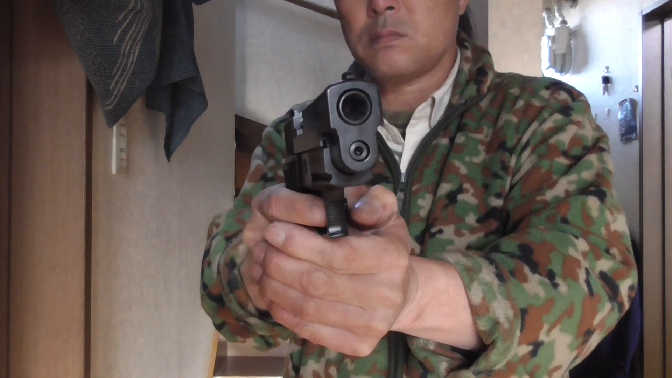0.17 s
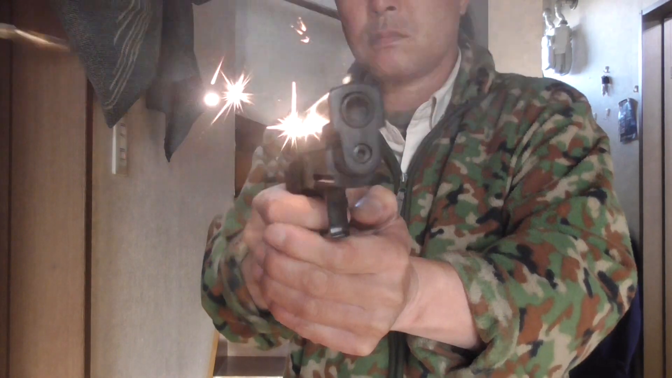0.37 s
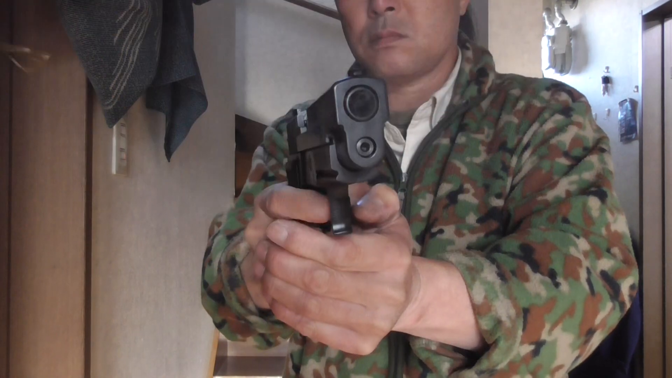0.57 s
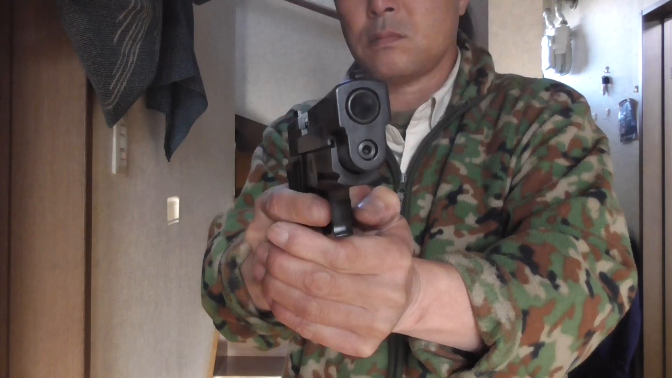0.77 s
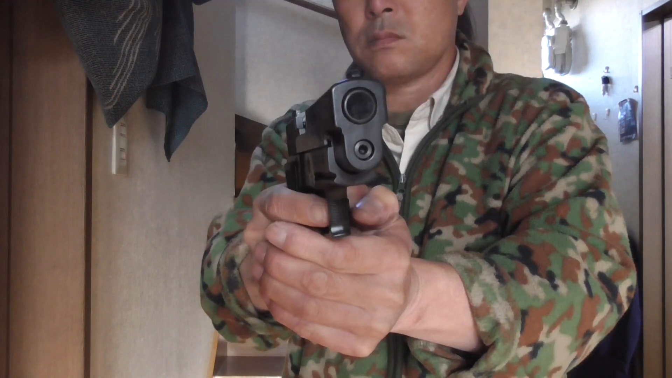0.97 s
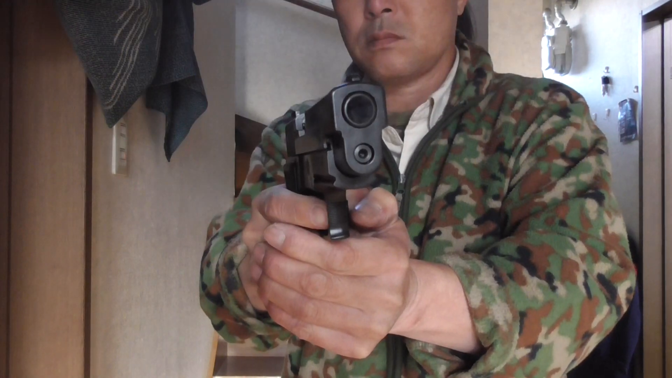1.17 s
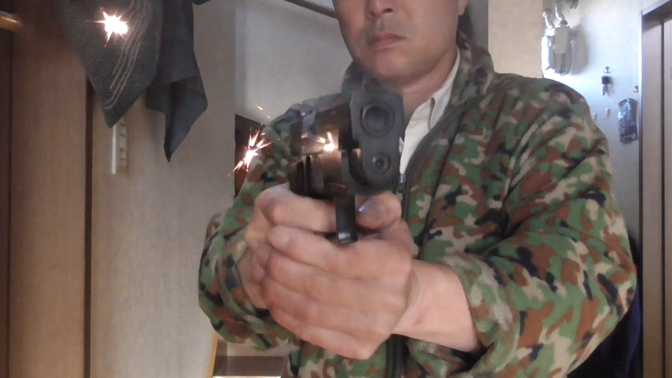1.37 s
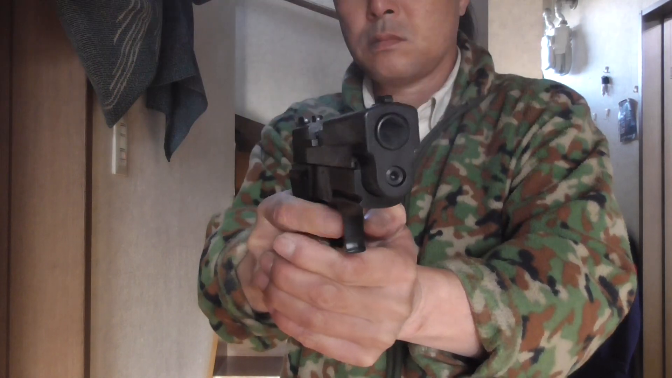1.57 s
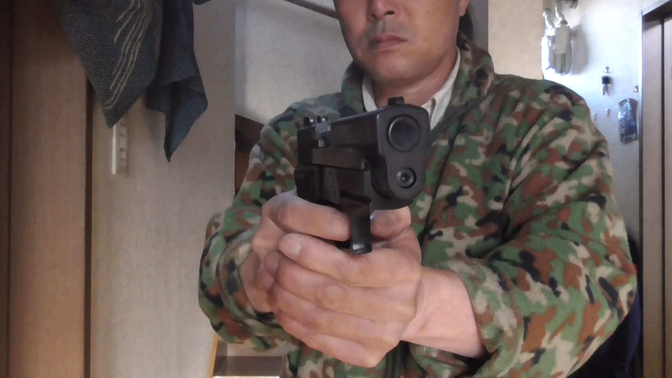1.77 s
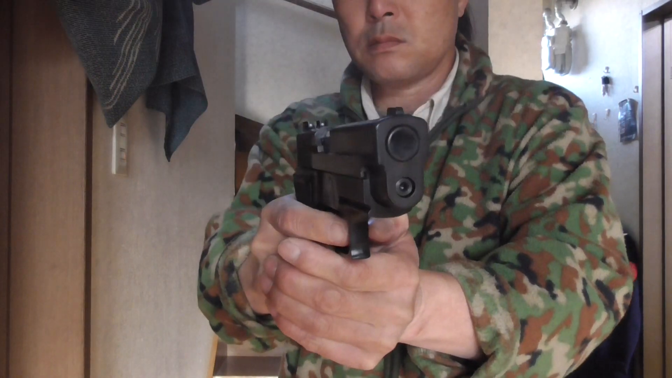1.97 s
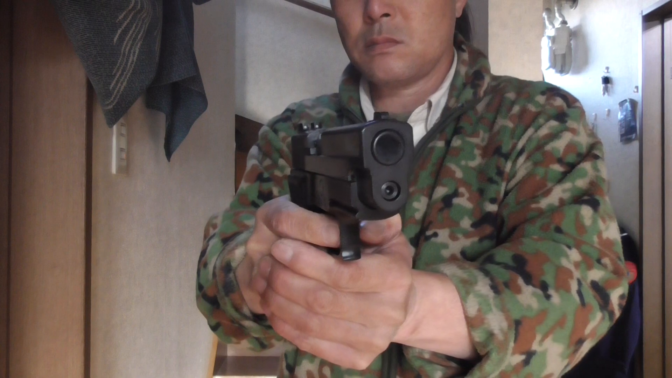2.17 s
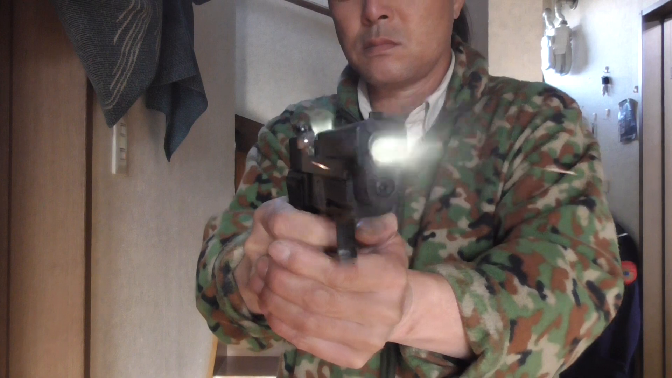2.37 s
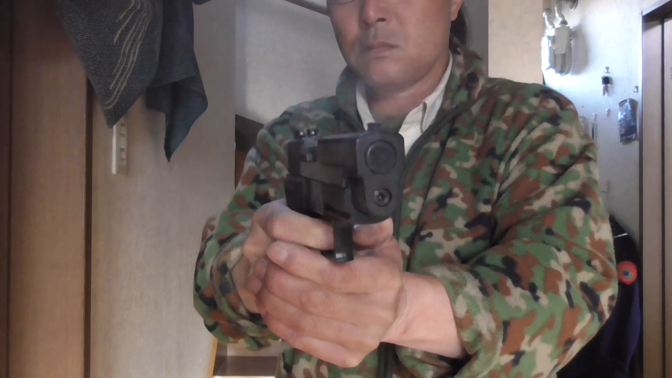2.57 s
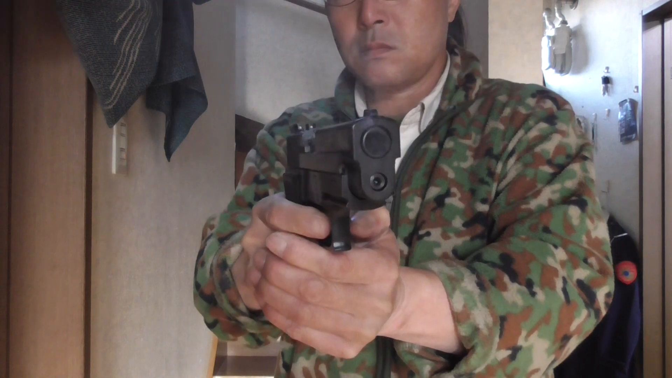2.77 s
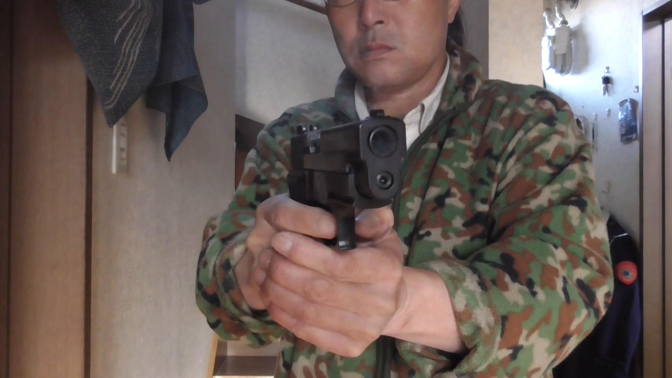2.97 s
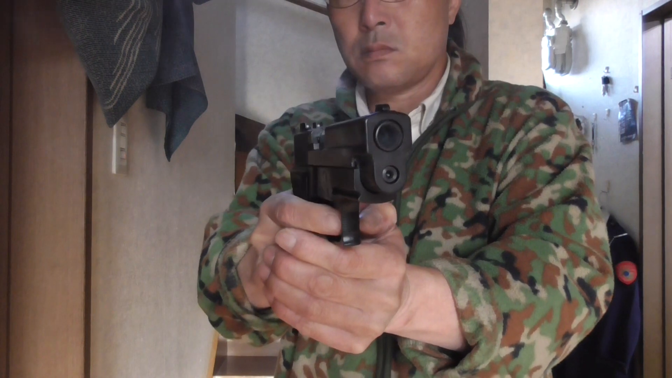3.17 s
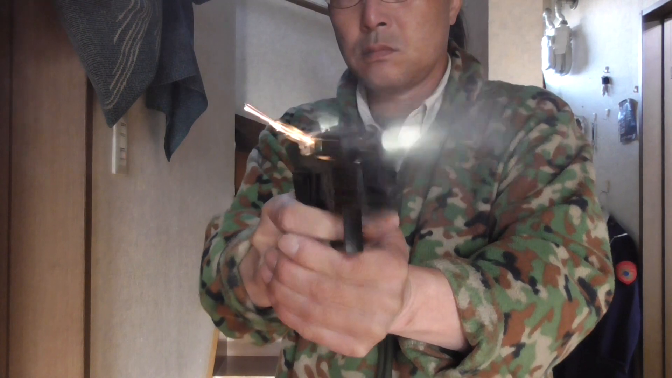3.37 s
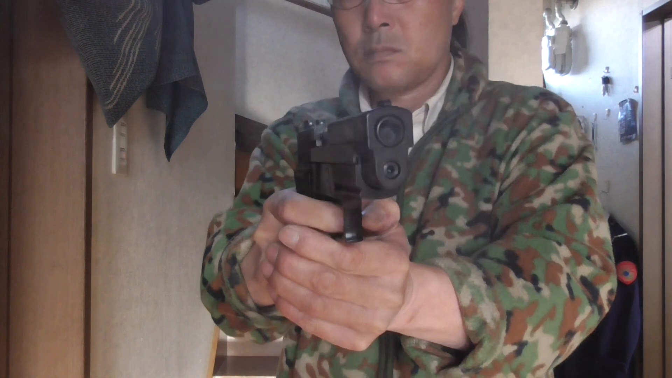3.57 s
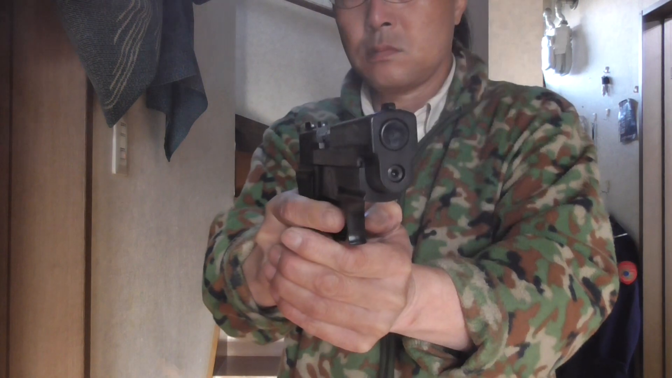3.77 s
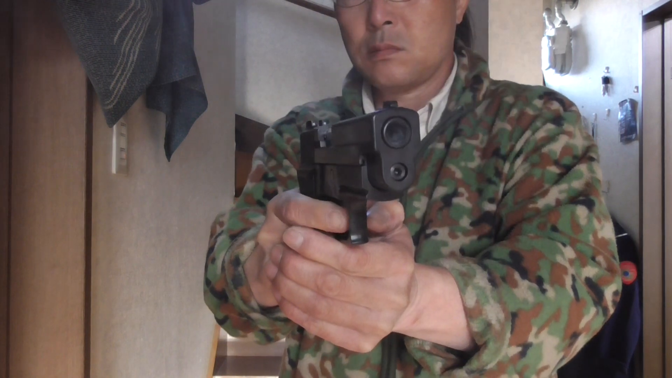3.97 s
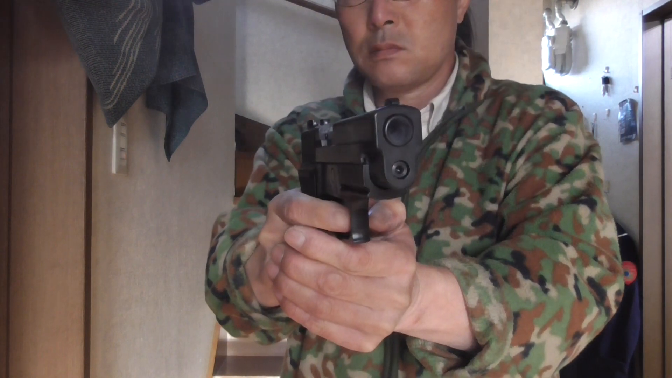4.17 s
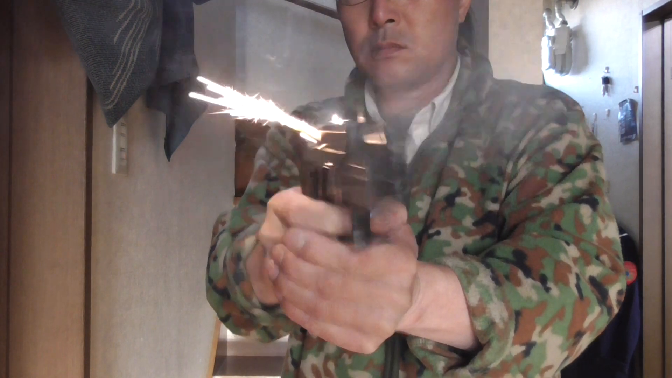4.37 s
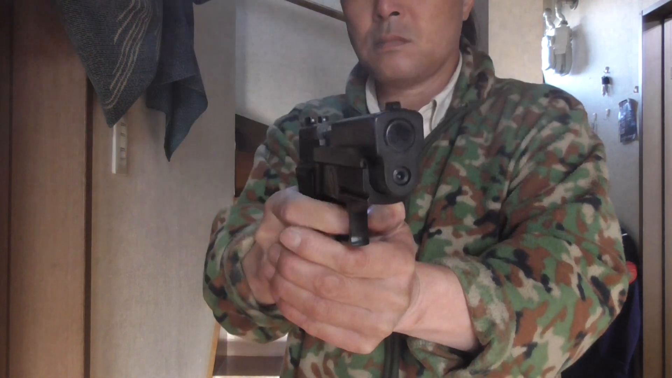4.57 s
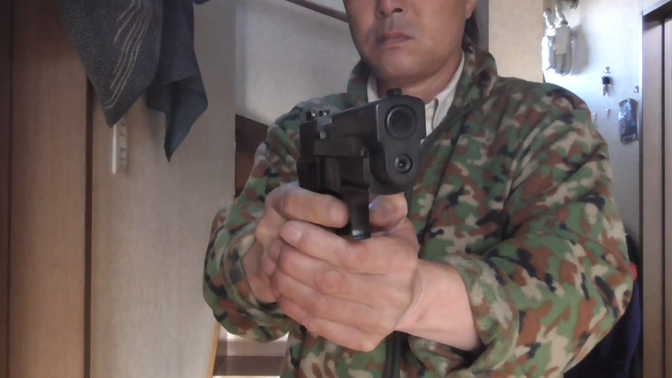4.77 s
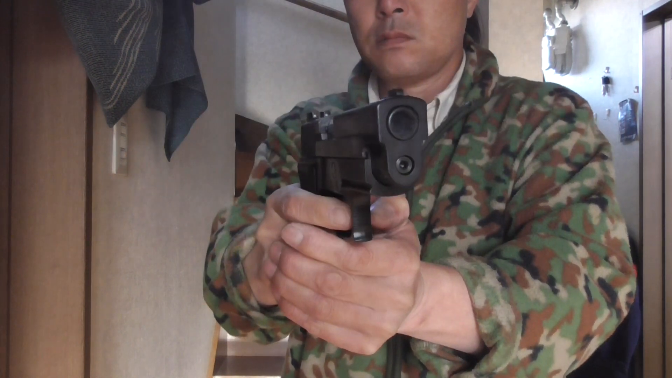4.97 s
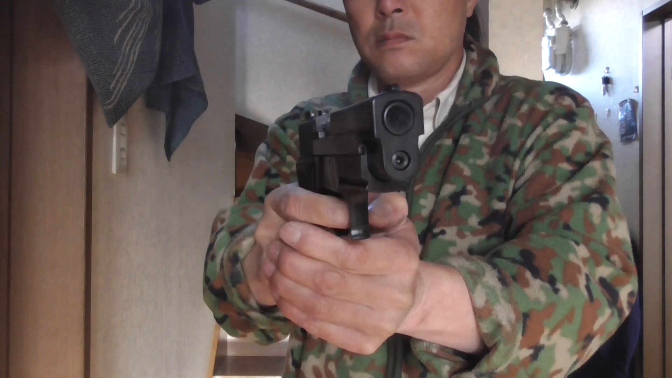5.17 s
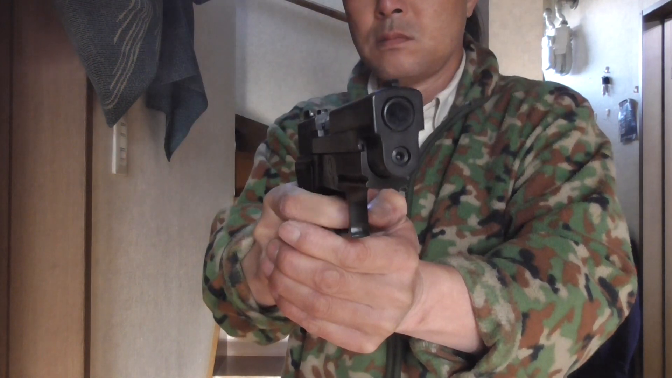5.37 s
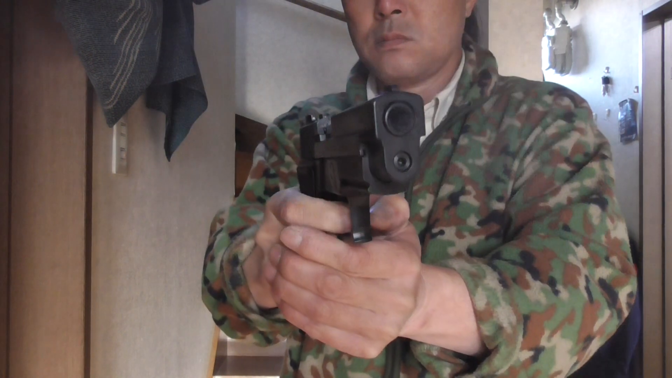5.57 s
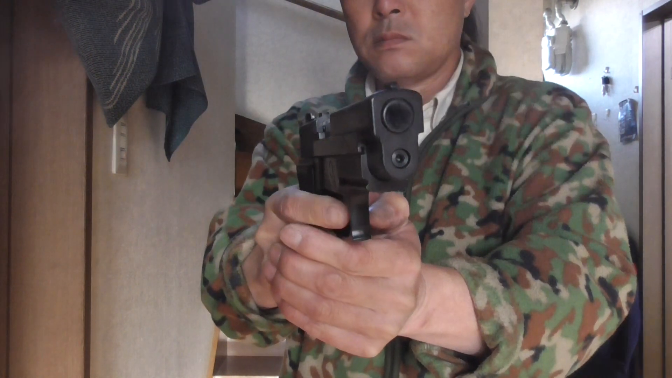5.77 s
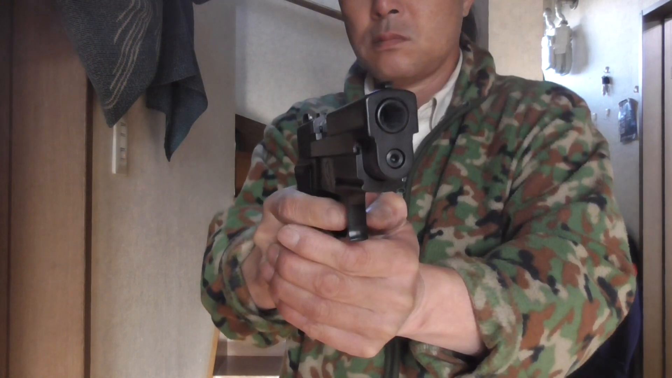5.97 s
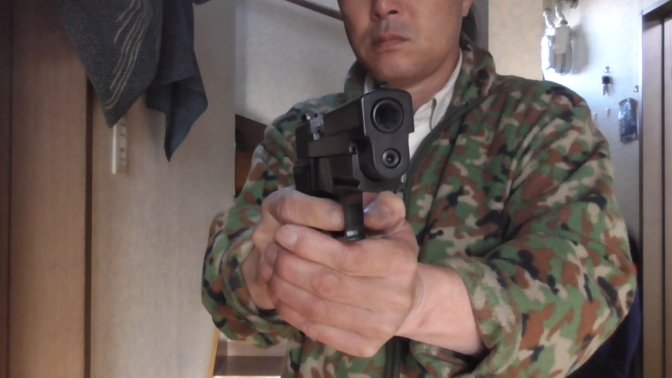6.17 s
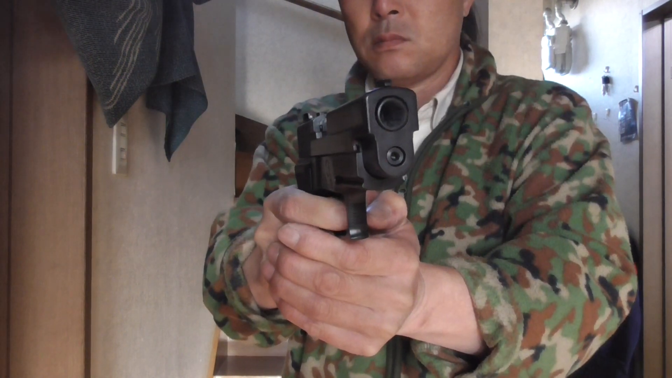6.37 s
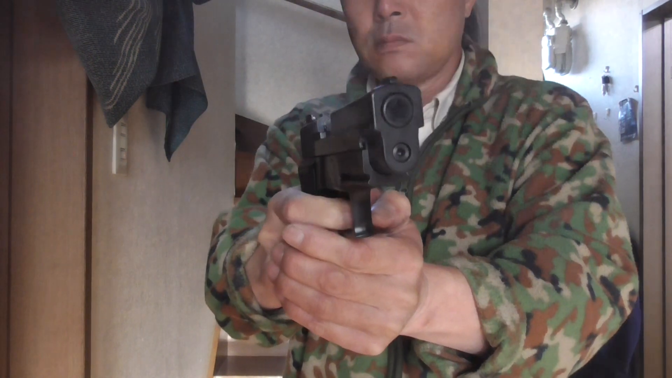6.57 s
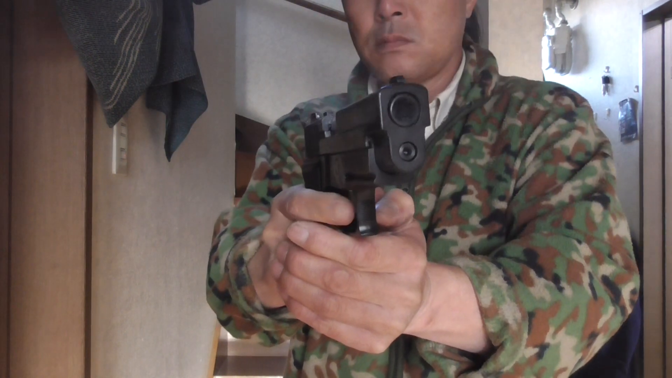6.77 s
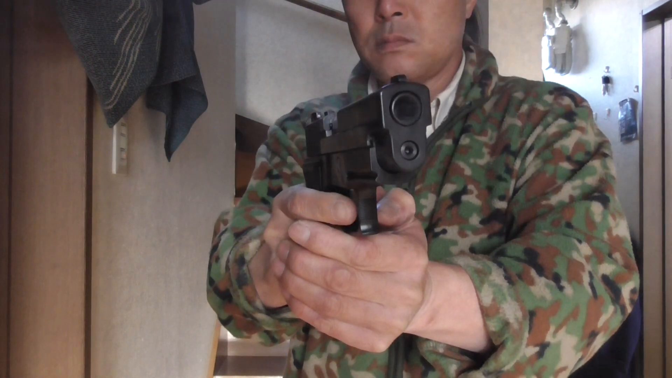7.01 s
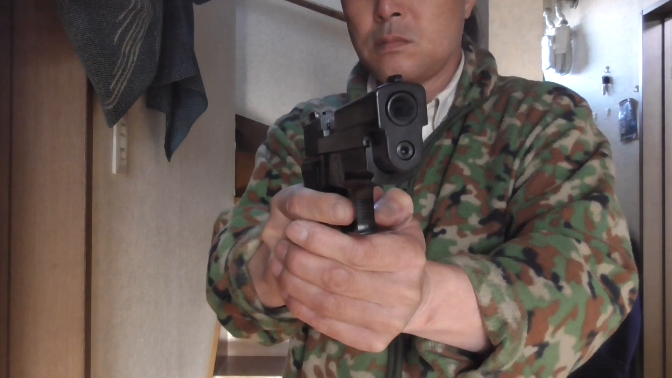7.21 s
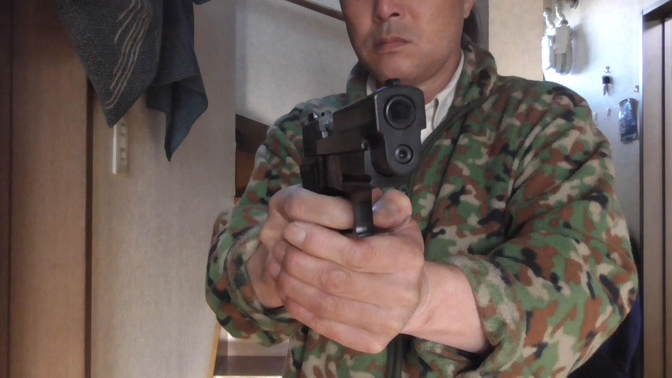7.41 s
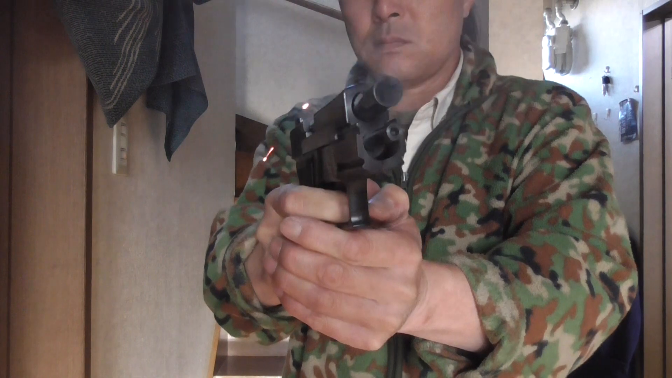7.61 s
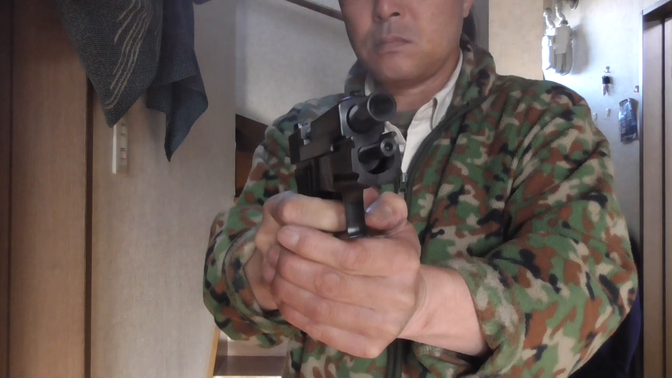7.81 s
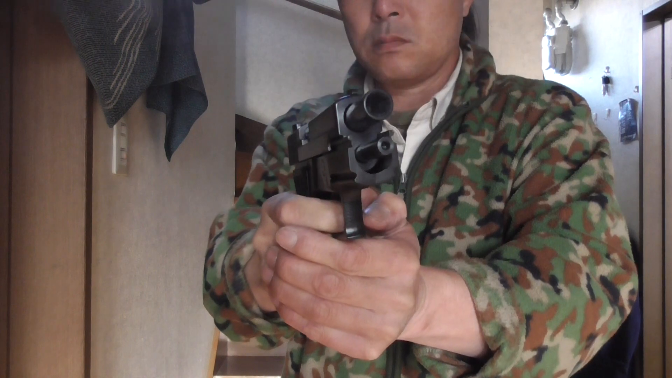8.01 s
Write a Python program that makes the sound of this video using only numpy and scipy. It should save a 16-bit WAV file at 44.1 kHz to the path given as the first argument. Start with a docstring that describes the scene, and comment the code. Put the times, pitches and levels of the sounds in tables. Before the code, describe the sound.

Steady cap-gun fire in a hard, reverberant hallway: a snapping bang every second, loud enough to clip the close microphone, followed by a quick roomy tail. About a tenth of a second later the spent case smacks the wall, and roughly half a second after that it lands on floorboards with a woody clack. Some shots have a thin steel hammer click; light ticks and low hiss lie between.

```python
"""In a hard-walled hallway a toy pistol fires caps once a second, close to a stereo microphone.
Each shot is a short noise crack, a low thump of the overloaded input and a noise blast shaped by
the hall's decay, with a slower tail from the rooms beyond. The spent metal case hits a wall and
bounces on the wooden floor: noise rattles with dying modes. Hammer clicks, light ticks, a faint
hum, a short low rumble and coloured background noise fill in the rest."""
import sys
import numpy as np
from scipy import signal
from scipy.io import wavfile

SR = 44100
rng = np.random.default_rng(int(sys.argv[2]) if len(sys.argv) > 2 else 0)


def to_wav(s):
    """Save 16-bit WAV."""
    ch = np.atleast_2d(s).T  # columns
    pcm = np.round(np.clip(ch, -1, 1) * 32767)  # PCM
    wavfile.write(sys.argv[1], SR, pcm.astype(np.int16))


N = 354784
LEAD = SR  # samples of scene before time zero
MIDDLE_HZ = 4200  # knock colours are counted against this pitch
# Pitches at which the colour of a knock is given. Each entry: frequency in Hz.
COLOUR_HZ = (250, 900, 2200, 8000, 13500)


def gain_of(db):
    """dB to gain."""
    return 10 ** (np.asarray(db) / 20)


def peaked(x):
    """Scales a sound to peak 1."""
    return x / abs(x).max()


def read(points, hz, column=1):
    """Reads a table on a log-frequency axis, as a column."""
    points = np.array(points)
    return np.interp(np.log(hz + 1), np.log(points[:, 0] + 1), points[:, column])[:, None]


def add(mix, s, sound):
    """Adds a stereo sound at time s."""
    part = mix[:, LEAD + round(s * SR):][:, :sound.shape[1]]
    part += sound[:, :part.shape[1]]


def unit_energy(x):
    """Scales a stereo sound to energy 1, averaged over the channels."""
    return x / np.sqrt(np.mean(np.sum(x ** 2, 1)))


def noise(size, colour, shape):
    """Stereo noise of energy 1 whose short-time magnitude is colour(f) times shape(f, t)."""
    # Likeness of left and right. Each row: frequency in Hz, correlation (held within -1 to 1 below).
    likeness = [(60, -1.7), (120, 0.81), (240, 0.89), (480, 0.83), (950, 0.69), (1890, 0.57), (3770, 0.67),
                (7520, 0.23), (15000, -0.15)]
    frames, hz = size // 128 + 5, np.fft.rfftfreq(512, 1 / SR)
    a, b, c, d = rng.standard_normal((frames, len(hz), 4)).T
    same = np.clip(read(likeness, hz), -1, 1)
    left, other = a + 1j * b, c + 1j * d
    right = same * left + np.sqrt(1 - same ** 2) * other
    magnitude = gain_of(read(colour, hz)) * shape(hz, np.arange(frames) * 128 / SR)
    spectrum = np.array([left, right]) * magnitude
    return unit_energy(signal.istft(spectrum, nperseg=512, noverlap=384)[1][:, :size])


def coloured(points, size=1024):
    """Minimum-phase (causal) impulse response with the given (Hz, dB) spectrum."""
    half = read(points, np.fft.rfftfreq(size, 1 / SR))[:, 0] * np.log(10) / 20
    log_gain = np.concatenate([half, half[-2:0:-1]])
    return np.fft.ifft(np.exp(np.conj(signal.hilbert(log_gain)))).real[:size // 2]


def tilted(colour_db, body, bright):
    """A colour tipped by dB per octave below and above the middle."""
    octaves = np.log2(np.array(COLOUR_HZ) / MIDDLE_HZ)
    return colour_db + body * np.maximum(-octaves, 0) + bright * np.maximum(octaves, 0)


def rings(modes, t, spread, near_hz=None):
    """Dying modes, each a little off its usual pitch; those near the favoured pitch sound most."""
    total = 0
    for hz, db, t60 in modes:
        away_db = 18 * abs(np.log2(hz / (near_hz or hz)))  # 18 dB per octave off the favoured pitch
        pitch = hz * rng.normal(1, spread)
        total = total + gain_of(db - away_db - 60 * t / t60) * np.sin(2 * np.pi * pitch * t)
    return total


def background_noise():
    """Steadily coloured background noise, its level moved by slow recording gain."""
    # Spectrum of the background. Each row: frequency in Hz, relative density in dB.
    background_colour = [(40, -13), (100, -8.5), (300, 2.5), (900, -2), (2000, -10.5), (5000, -22),
                         (8000, -26.5), (11000, -26), (16000, -38.5)]
    slow_gain = [(0, 0.5), (1.2, -13), (2, -2.5), (3, -5.5), (4, -2), (5, -3.5), (6.2, -6.5), (7, -9.5),
                 (8.1, -7.6)]
    steady = noise(N, background_colour, lambda hz, t: gain_of(np.interp(t, *np.transpose(slow_gain))))
    return gain_of(-57.5) * np.sqrt(N) * steady  # RMS in dB


def rumble():
    """Short low noise that swells and fades."""
    # When it sounds. The row: start in seconds, end in seconds.
    rumble_span = (5.2, 5.47)
    start, end = rumble_span
    size = round((end - start) * SR)
    band = signal.butter(2, (60, 300), "bandpass", fs=SR, output="sos")
    low = signal.sosfilt(band, rng.standard_normal(size))
    return start, np.tile(gain_of(-46.5) * low / low.std() * np.hanning(size), (2, 1))


def hum():
    """A faint brief tone whose phase wavers 9 times a second."""
    # The tone. The row: start in seconds, end in seconds, pitch in Hz, peak level in dB.
    hum_note = (1.05, 1.21, 478, -60)
    start, end, hz, db = hum_note
    t = np.arange(0, end - start, 1 / SR)
    tone = np.sin(2 * np.pi * hz * t + 1.8 * np.sin(2 * np.pi * 9 * t))
    return start, np.tile(gain_of(db) * tone * signal.windows.tukey(len(t), .6), (2, 1))


def hall(hz, t):
    """Quick decay of the hallway plus the slow return of the rooms beyond."""
    # Decay of the hallway. Each row: frequency in Hz, t60 in seconds.
    hall_decay = [(60, 0.15), (150, 0.49), (400, 0.71), (1000, 0.65), (2500, 0.36), (5000, 0.53),
                  (9000, 0.25), (15000, 0.17)]
    # Return of the rooms beyond. Each row: frequency in Hz, level against the hallway in dB, t60 in seconds.
    rooms_beyond = [(59.8, -49.5, 2.7), (194, -15.5, 1.4), (790, -25, 1.6), (2060, 1, 0.62),
                    (4460, -31, 1.17), (7550, -6.5, 0.6), (11900, -20.5, 0.56), (15500, -33, .7)]
    near = gain_of(-60 * t / read(hall_decay, hz))
    far = gain_of(read(rooms_beyond, hz) - 60 * t / read(rooms_beyond, hz, column=2))
    return np.sqrt(near ** 2 + far ** 2)


def standing(size):
    """The hall's standing waves, energy 1, nearly alike in both capsules."""
    # Standing waves set off by the blast. Each row: frequency in Hz, relative level in dB.
    hall_modes = [(300, 0), (339, -9), (403, -2.5), (474, -2), (529, -4.5), (581, 1), (654, 1.5), (716, -3),
                  (749, 2), (834, -0.5), (889, -7), (945, -4), (1030, -6.5), (1096, -5), (1211, -6),
                  (1255, -10)]
    t = np.arange(size) / SR
    waves = 0
    for hz, db in hall_modes:
        turns = hz * t + rng.random() + rng.normal(0, 0.095, (2, 1))  # phases differ a little by side
        waves = waves + gain_of(db - 60 * t / 0.6) * np.sin(2 * np.pi * turns)  # t60 of 0.6 s
    return unit_energy(waves)


def knock(tail, db, colour_db, case, wood, pan_db, hall_db, damping, length):
    """A short rattle of the case on wood, the rings of both, and the hall's answer."""
    # Rings of the metal case. Each row: frequency in Hz, relative level in dB, t60 in seconds.
    case_modes = [(2320, -5, 0.05), (3300, -5, .045), (4140, -4, .055)]
    # Rings of boards and panels. Each row: frequency in Hz, relative level in dB, t60 in seconds.
    wood_modes = [(304, -3, 0.04), (375, 0, 0.085), (444, -1.5, 0.05), (535, 0, .04), (815, -3, 0.035),
                  (1000, -3, 0.04), (1220, -3, .04)]
    t = np.arange(tail.shape[1]) / SR
    size = 4000  # samples of ringing
    fade = np.exp(-(t[:600] / length) ** 2)
    weight = np.linalg.norm(fade)
    hit = rng.standard_normal((3, 600)) * fade
    deep_bass = (60, colour_db[0] - 27)  # knocks hold little deep bass
    colour = coloured(sorted([deep_bass, (MIDDLE_HZ, 0), *zip(COLOUR_HZ, colour_db)]))
    rattle = signal.fftconvolve(hit[0] + 1.34 * hit[1:], colour[None], axes=1)
    rattle *= weight / np.linalg.norm(rattle, axis=1, keepdims=True)

    case_ring = gain_of(case[0]) * rings(case_modes, t[:size], .012, case[1])
    wood_ring = gain_of(wood[0]) * rings(wood_modes, t[:size], .02, wood[1])
    ring = (case_ring + wood_ring) * (1 - np.exp(-t[:size] / 0.0012))  # builds up during the contact

    # summed over all directions the rattle keeps only broad humps, other ones at every landing
    humps = np.column_stack([np.geomspace(300, 14000, 22), rng.normal(0, 2.5, 22)])
    colour = np.convolve(colour, coloured(humps))[:len(colour)]
    sent = gain_of(-12) * ring  # the hall gets only a share of the rings
    sent[:len(colour)] += colour * weight / np.linalg.norm(colour)
    late = tail * gain_of(hall_db - max(damping, 0) * t) * np.clip(t / 0.0056, 0, 1)
    out = signal.fftconvolve(sent[None], late, axes=1)[:, :len(t)]

    side = gain_of([[pan_db / 2], [-pan_db / 2]])
    out[:, :size] += ring * side
    out[:, :rattle.shape[1]] += rattle * side
    return gain_of(db) * out


def tick(tail, db, mid_db, hall_db):
    """A knock too light to move the wood or ring the case."""
    colour_db = (-30., -14., -5., -mid_db, -mid_db - 14.5)
    silent = (-99, MIDDLE_HZ)
    return knock(tail, db, colour_db, silent, silent, pan_db=0, hall_db=hall_db, damping=30, length=0.0016)


def wall_hit(tail, db, bright, *case):
    """Every case meets the same wall in much the same way."""
    # Colour of the wall knock at the five COLOUR_HZ. Each entry: level against the middle in dB.
    wall_colour = (-27, 5.5, -9.5, -0.5, -14)
    return knock(tail, db, tilted(wall_colour, 0, bright), case, wood=(-1, 424),  # dB, Hz
                 pan_db=3, hall_db=1.7, damping=7.3, length=0.007)  # damping in dB/s, length in s


def drop(tail, db, body, bright, case_db, case_hz, wood_db, wood_hz, damping):
    """A landing on the floor: flat ones have more body, edge-on ones more treble."""
    # Colour of a landing at the five COLOUR_HZ. Each entry: level against the middle in dB.
    drop_colour = (1.2, 2.1, -6.5, -5, -16)
    return knock(tail, db, tilted(drop_colour, body, bright), (case_db, case_hz), (wood_db, wood_hz),
                 pan_db=-0.3, hall_db=0.5, damping=damping, length=0.0036)


def case_knocks(mix):
    """The flung case and the trigger strike; each knock excites one of six hall responses."""
    # What a knock gets back from the hall. Each row: frequency in Hz, relative level in dB.
    hall_answer = [(100, 3.5), (400, 1), (1000, 2), (1700, 0.5), (2200, 7.5), (2800, 2), (4200, -1),
                   (7000, -2.5), (10000, 1), (15000, -0.5)]
    # The flung case strikes the wall. Each row: start in seconds, level in dB, brightness in dB per
    # octave, ring of the case in dB, its strongest pitch in Hz.
    wall_hits = [(0.539, -19, -2.5, -3, 4220), (1.533, -20, -4, 5, 2330), (2.595, -19.5, -6.5, -3, 4140),
                 (3.601, -19, -2.8, 4, 4170), (4.592, -17.5, -0.5, 0, 3700), (5.628, -22, -0.5, 5, 3300),
                 (6.67, -21, -4.2, 5, 3180), (7.687, -19, 2.5, -14, 4120)]
    # The case lands and bounces. Each row: start in seconds, level in dB, body in dB per octave below the
    # middle, brightness in dB per octave above it, ring of the case in dB, its strongest pitch in Hz,
    # ring of the wood in dB, its strongest pitch in Hz, extra hall damping in dB/s (below 0 acts as 0).
    landings = [(.052, -14, 0.2, 1.2, -23, 2380, -14.5, 483, 13),
                (.26, -19, -0.4, -3, -22, 4200, -12.5, 516, 14.5),
                (.3516, -24.5, -3.5, -3.5, -17, 4260, -19, 797, 11),
                (.882, -23, -1, -10, -6, 3430, -7, 914, 62),
                (1.342, -14, -0.5, 2.5, -8, 3240, -6, 816, 31.5),
                (2.0765, -13, 1.3, 2, -15.5, 2300, -3.5, 530, 9.9),
                (3.183, -14.5, -2, 2.1, -7, 3400, -7, 990, -3.5),
                (4.164, -14.5, -0.5, 1, -12, 4110, -8, 350, -3.5),
                (4.8255, -30.5, -4, 9.5, -16, 3320, -28, 611, 63),
                (5.1713, -14.5, -0.54, 1.2, -13, 3390, -3, 536, 2),
                (5.8349, -27, 2.5, -3, 0, 2260, -10, 533, 32),
                (5.85, -32.5, -2.5, 0.5, -1, 3860, -42, 298, 13.5),
                (5.923, -29.5, -0.4, -2, -10, 2280, -23.5, 528, 21),
                (6.013, -17, -1.2, 4.5, -8, 2350, 2, 440, 80),
                (6.232, -13.5, 1.5, 3, -12, 3890, -1, 1230, 9),
                (6.4931, -22.5, 3.5, -4.5, -14, 4200, -3, 794, -9),
                (7.128, -14.5, 0.7, -1.5, -6.5, 3250, -5.5, 1250, 12),
                (7.22, -22.5, 2.5, 0.5, -12, 2200, 0, 1030, 47),
                (7.3453, -22, -1.4, 3.2, -26, 4200, -10, 807, -5)]
    # Light bright ticks of trigger and rolling case. Each row: start in seconds, level in dB,
    # 4.2 kHz over 8 kHz in dB, hall in dB.
    light_ticks = [(0.6, -34, -6, -9), (1.61, -26.5, -6, 6.5), (1.8933, -56, 2.5, -8),
                   (2.4364, -42.5, 10, 0), (2.6544, -45, -6, -9), (2.6806, -25, .1, -15),
                   (2.7194, -45, -6, -3), (2.742, -35, 2, 4), (2.7804, -34, 2, 5), (3.1084, -53.5, 12, 7.5),
                   (3.433, -43, 6, 1.5), (4.0402, -58, .1, 10.5), (4.4308, -45.5, 3.5, 1),
                   (5.0809, -52.5, 6, 7), (5.694, -29, -8, -17), (5.976, -44, -1, 11),
                   (6.7126, -30, -15, -16), (6.7472, -27, -4, 7.5), (6.8424, -38, 5, 6),
                   (6.9008, -45, 2, 6), (6.9343, -44, 8, 1), (7.0863, -49, -8, 7), (7.427, -34, -7, 1),
                   (7.518, -42, 17, 0)]
    places = [noise(SR * 3 // 4, hall_answer, hall) for _ in range(6)]
    for rows, sound in ((wall_hits, wall_hit), (landings, drop), (light_ticks, tick)):
        for k, (s, *row) in enumerate(rows):
            add(mix, s, sound(places[k % len(places)], *row))


def hammer(db):
    """Steel on steel: the pistol's frame rings briefly."""
    # Rings of the frame. Each row: frequency in Hz, relative level in dB, t60 in seconds.
    frame_modes = [(2100, -18, .016), (5100, -8, .016), (6800, -6, .005), (8400, 0, .0055),
                   (10200, -6, .005)]
    t = np.arange(1300) / SR
    return gain_of(db) * peaked(np.array([rings(frame_modes, t, .03), rings(frame_modes, t, .03)]))


def hammer_strikes(mix):
    """The hammer slips off the sear, then strikes a moment later."""
    # Strikes just before the cap goes off. Each row: start in seconds, peak in dB.
    strikes = [(2.4708, -9), (3.4608, -8), (4.458, -7), (5.4926, -6), (7.5426, -14)]
    for s, db in strikes:
        add(mix, s - 0.0037, hammer(-24))  # the slip
        add(mix, s, hammer(db))


def thump(s, left, right):
    """Low thump of the overloaded input: one swing and a half, opposite in sign left and right."""
    lag_s, thump_hz = 0.00672, 218
    u = np.arange(-440, 440) / SR
    swing = np.cos(2 * np.pi * thump_hz * u) * np.exp(-(u * thump_hz / 0.58) ** 2)
    return s + lag_s + u[0], np.outer([left, right], swing)


def shot(tail, crack_db, blast_db):
    """A rattling crack near 8 kHz, then the blast swelling in the hall."""
    # Spectrum of the crack. Each row: frequency in Hz, relative level in dB.
    crack_colour = [(200, -33.5), (1500, -17), (4500, -4), (6500, -3), (8300, 5.5), (10500, -8),
                    (15000, -24)]
    t = np.arange(tail.shape[1]) / SR
    fade = np.exp(-(t[:900] / 0.0036) ** 2) * np.minimum(t[:900] / 0.001, 1)
    puff = rng.standard_normal((3, 900)) * fade
    crack = signal.fftconvolve(puff[0] + 0.24 * puff[1:], coloured(crack_colour)[None], axes=1)
    out = gain_of(blast_db) * tail * (1 - np.exp(-t / 0.0029))  # reflections pile up over some ms
    out[:, :crack.shape[1]] += gain_of(crack_db) * peaked(crack)
    return out


def cap_shots(mix):
    """Caps go off in one shared hall response, mixed with a stray part that differs by shot."""
    # The shots. Each row: start in seconds, crack peak in dB, blast level in dB,
    # low thump of the overloaded input as peak on the left and on the right (linear).
    cap_rows = [(0.405, -6.5, 21.7, 0.46, -1.22), (1.411, -4.5, 22.05, 0.71, -2.07),
                (2.4726, -4, 22.6, -0.67, 0.25), (3.463, -5, 21.2, 0.081, -0.45),
                (4.4602, -4, 21.6, 0.091, -0.43), (5.4946, -5, 20.7, 0.19, -0.4),
                (6.5115, -5, 20.9, 0.21, -0.44), (7.5437, -4.5, 20.6, 0.56, -0.4)]
    # A shot before time zero, only its tail is left. The row: start in seconds, crack peak in dB,
    # blast level in dB.
    earlier_shot = (-0.98, -12, 41.5)
    # Cap blast in the hall. Each row: frequency in Hz, relative density in dB.
    blast_colour = [(35, -49.5), (60, -49), (233, -5.5), (308, -14.5), (492, -5.5), (651, -5.5), (732, -6),
                    (1220, -5.5), (1740, -19.5), (4220, -11.5), (6140, -17), (8510, -12), (16000, -16.5)]
    aim, stray = noise(2 * SR, blast_colour, hall), noise(2 * SR, blast_colour, hall)
    aim = aim + gain_of(-6) * standing(2 * SR)
    for k, (s, crack_db, blast_db, *thump_peaks) in enumerate([earlier_shot] + cap_rows):
        shift = np.roll(stray, 7 * k, 1) * (-1) ** k  # the aim shifts a little from shot to shot
        add(mix, s, shot(0.66 * aim + .5 * shift, crack_db, blast_db))
        if thump_peaks:
            add(mix, *thump(s, *thump_peaks))


def scene():
    """Background noise, rumble and hum lie under the knocks of the case and the shots."""
    mix = np.zeros((2, LEAD + N))
    add(mix, 0, background_noise())
    add(mix, *rumble())
    add(mix, *hum())
    case_knocks(mix)
    hammer_strikes(mix)
    cap_shots(mix)
    return mix[:, LEAD:]


def record(dry):
    """The microphone drops the deep bass, the input clips on the loudest swings; then the band limit."""
    thin = signal.sosfilt(signal.butter(2, 60, "highpass", fs=SR, output="sos"), dry)
    edge = signal.firwin(511, 15900, window=("kaiser", 9), fs=SR)  # band limit in Hz
    clipped = np.clip(thin, -1, 1)
    return np.clip(signal.oaconvolve(clipped, edge[None], "same"), -1, 1)


dry = scene()
out = record(dry)
to_wav(out)
```